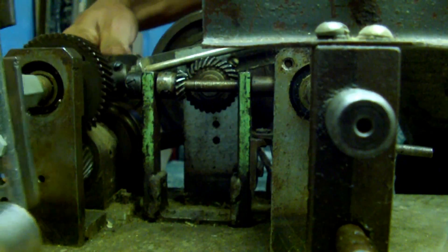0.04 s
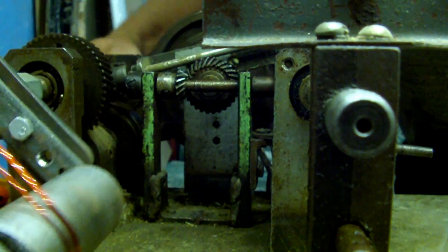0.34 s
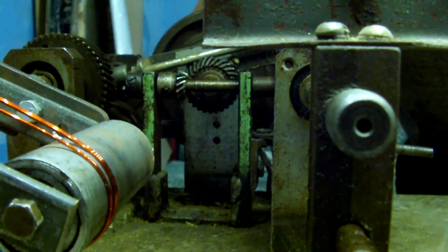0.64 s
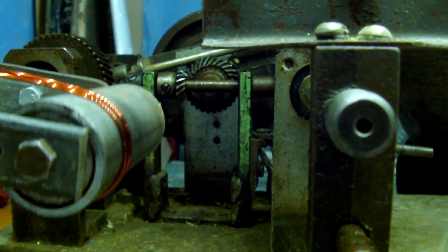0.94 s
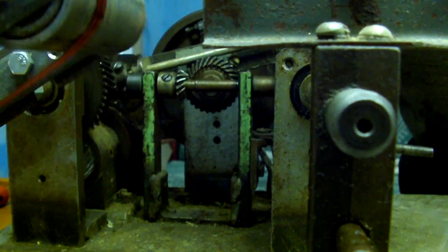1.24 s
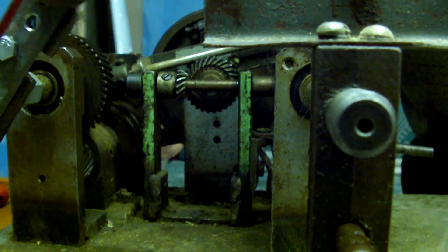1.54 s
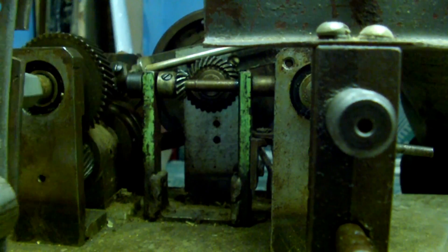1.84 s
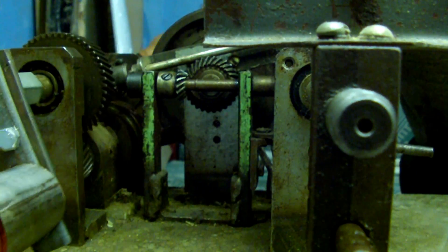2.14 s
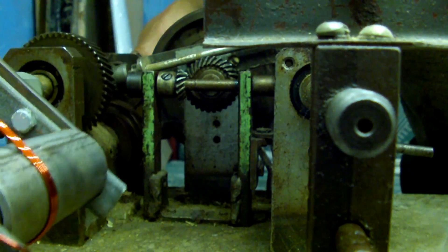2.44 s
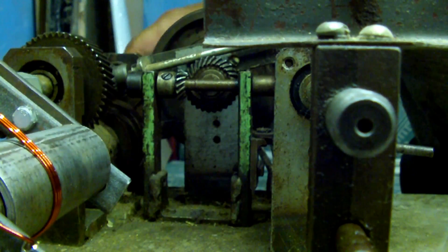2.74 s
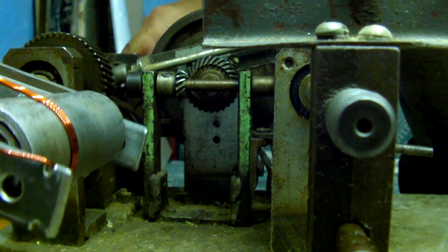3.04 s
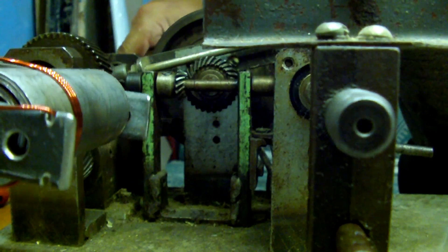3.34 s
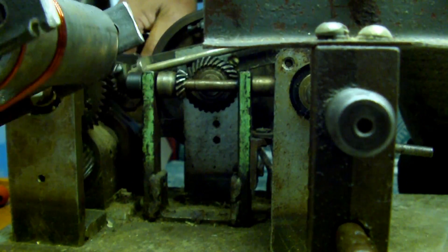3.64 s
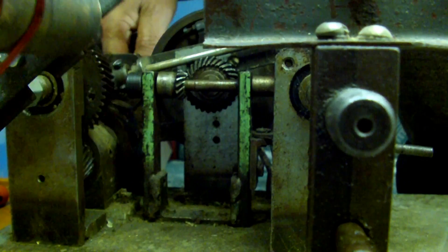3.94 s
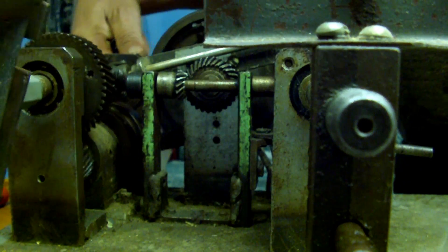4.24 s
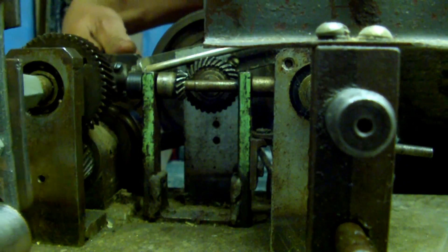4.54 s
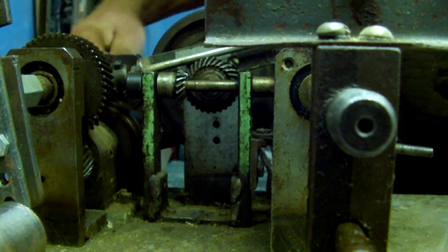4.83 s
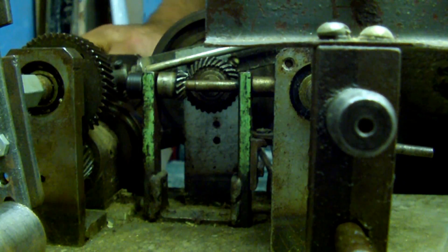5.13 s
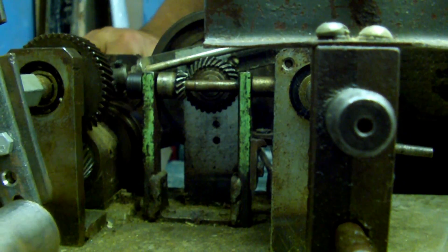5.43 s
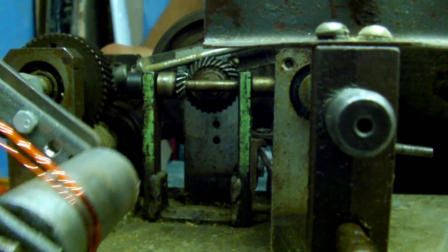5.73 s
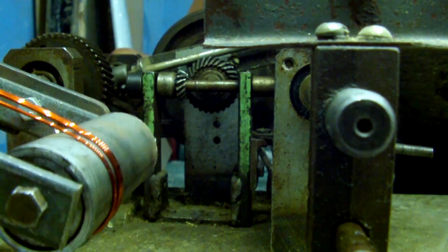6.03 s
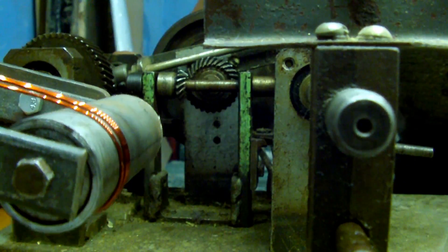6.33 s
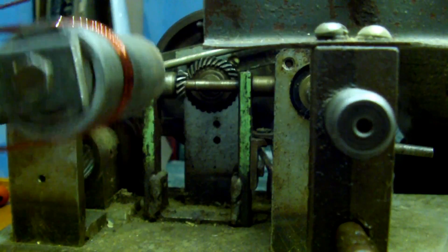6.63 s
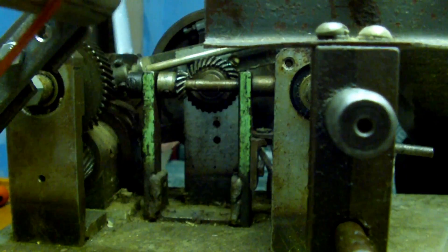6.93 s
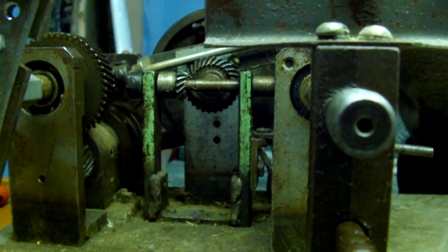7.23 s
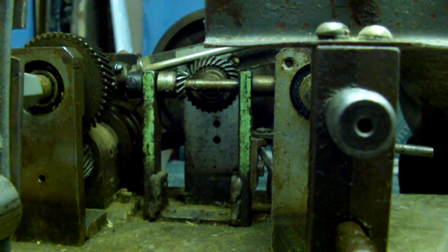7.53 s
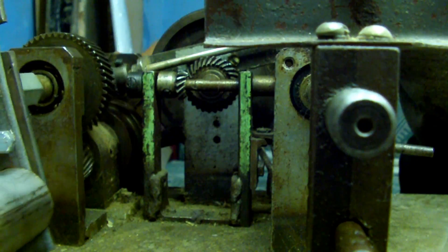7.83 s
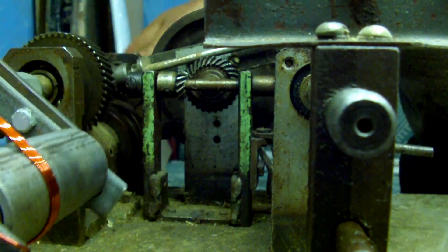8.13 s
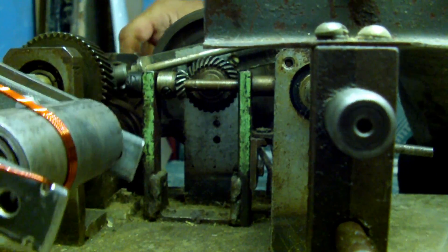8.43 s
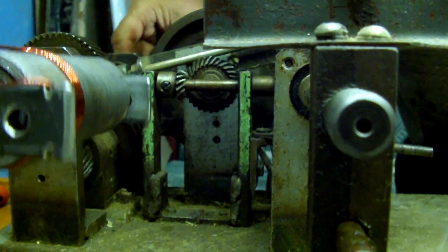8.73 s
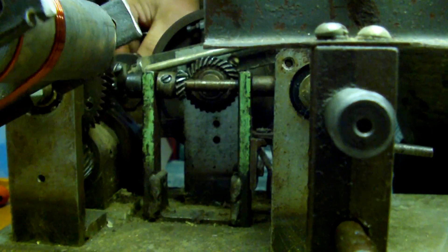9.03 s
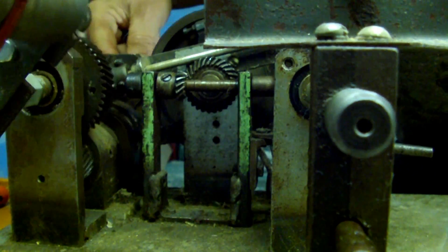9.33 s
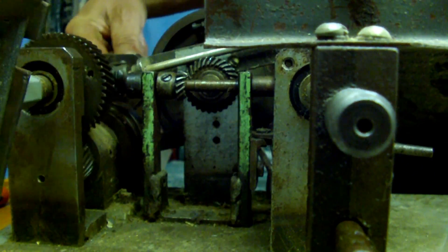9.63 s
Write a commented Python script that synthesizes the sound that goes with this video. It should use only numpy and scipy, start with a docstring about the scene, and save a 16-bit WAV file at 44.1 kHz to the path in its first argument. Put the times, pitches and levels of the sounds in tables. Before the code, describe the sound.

Metal gears whirr and rattle in surges as a coil winder is turned by hand, with irregular clicks and a few sharp clanks.

```python
"""A small workshop, the microphone close to a hand-turned coil winder, over room hiss and a thin whine.
The gears whirr at once; slack teeth knock on the steel frame, hardest at 0.5 s, and copper wire snaps
on the former. From 1 s on, the train clunks and clatters whenever the load on the arm turns over,
between pulls on the wheel and faint ticks and chirps. Around 5 s the crank creaks twice, each time
before a knock. A second hard blow lands at 8.2 s, and a last pull sets the wheels singing near 9.6 s."""
import sys
import numpy as np
from scipy import signal
from scipy.fft import rfft, irfft
from scipy.io import wavfile
from scipy.ndimage import uniform_filter1d

SR = 44100
rng = np.random.default_rng(int(sys.argv[2]) if len(sys.argv) > 2 else 0)


def master_out(mix):
    """Clip the mix to full scale and print it as 16-bit PCM to the path in sys.argv[1]."""
    frames = np.transpose(np.atleast_2d(mix))
    ceiling = np.clip(frames, -1, 1)
    pcm = np.round(ceiling * 32767).astype(np.int16)
    wavfile.write(sys.argv[1], SR, pcm)


N = 430857
T = np.arange(N) / SR
RING_S = np.arange(SR // 8) / SR  # time axis of one short event


def undb(db):
    """Decibels to gain."""
    return 10 ** (np.asarray(db) / 20)


def unit(x):
    """Scale to rms 1."""
    return x / np.sqrt(np.mean(x ** 2))


def peak(x, db):
    """Scale so that the loudest two milliseconds have this level."""
    return x * undb(db) / np.sqrt(uniform_filter1d(x ** 2, size=88).max())


def colour(x, points):
    """Causal filter through (frequency_hz, gain_db) points, built from the cepstrum."""
    hz, db = np.transpose(points)
    size = 4096
    bins_hz = np.maximum(np.fft.rfftfreq(size, 1 / SR), 1)
    gain = undb(np.interp(np.log(bins_hz), np.log(hz), db))
    cepstrum = irfft(np.log(gain))
    cepstrum[1:size // 2] *= 2
    cepstrum[size // 2 + 1:] = 0
    return signal.fftconvolve(x, irfft(np.exp(rfft(cepstrum))))[:len(x)]


def resonate(x, hz, width_hz):
    """One resonance with gain 1 at its centre."""
    return signal.lfilter(*signal.iirpeak(hz, hz / width_hz, fs=SR), x)


def band(x, hz, width_hz):
    """The same resonance twice, for steeper sides."""
    return resonate(resonate(x, hz, width_hz), hz, width_hz)


def wander(rate_hz):
    """Smoothed random levels with rms 1."""
    hold = max(int(SR / rate_hz), 1)
    steps = np.repeat(rng.standard_normal(N // hold + 1), hold)
    return unit(uniform_filter1d(uniform_filter1d(steps, hold), hold)[:N])


def swell(middle_s, half_s):
    """A smooth rise and fall in time, 1 at its middle."""
    return np.exp(-((T - middle_s) / half_s) ** 2 / 2)


def rise(time_s):
    """Exponential onset of a short event."""
    return 1 - np.exp(-RING_S / time_s)


def fade(t60_s):
    """Exponential decay of a short event."""
    return np.exp(-np.log(1000) * RING_S / t60_s)


def burst(t60_s):
    """A dying burst of noise."""
    return rng.standard_normal(len(RING_S)) * fade(t60_s)


def add(out, start_s, x):
    """Mix x into out at start_s."""
    i = max(int(start_s * SR), 0)
    out[i:i + len(x)] += x[:max(N - i, 0)]


# Room tone of the workshop: frequency_hz, gain_db
AIR_SPECTRUM = [(25, -0.5), (110, -22), (300, -16), (1100, -6.5), (2800, -18.5), (6000, -16), (12000, -15),
                (15500, -12.5)]
# Lines of a thin, high electrical whine: pitch_hz, level_db, spread_db
WHINE_LINES = [(8300, -74.5, 1), (9126, -65, 3), (11865, -75, .5), (15703, -74.5, .5)]

def background(air_db=-60, hiss_db=-68, rumble_db=-69.5):
    """Room hiss and a thin, high electrical whine; each channel has its own faint hiss and rumble."""
    air = undb(air_db) * unit(colour(rng.standard_normal(N), AIR_SPECTRUM))
    whine = 0
    for hz, db, spread_db in WHINE_LINES:
        pitch_hz = hz + 2 * spread_db * wander(40)
        tone = np.sqrt(2) * np.sin(2 * np.pi * np.cumsum(pitch_hz) / SR)
        gain = unit(undb(-spread_db * wander(24) ** 2))  # the treble flickers
        whine = whine + undb(db) * gain * tone
    bass_slope = [(20, -2), (100, -17.5), (4000, -53)]
    rumble = np.array([unit(colour(rng.standard_normal(N), bass_slope)) for _ in range(2)])
    return air + whine + undb(hiss_db) * rng.standard_normal((2, N)) + undb(rumble_db) * rumble


def room(x, t60_s=0.32, wet_db=-21):
    """The workshop answers with a short, dull tail, well below the direct sound."""
    t = np.arange(SR // 2) / SR
    tail = rng.standard_normal(len(t)) * np.exp(-np.log(1000) * t / t60_s) * (t > .008)
    tail = colour(tail, [(500, 9.5), (1500, -5.0), (8000, -5.5)])
    return x + undb(wet_db) * signal.fftconvolve(x, tail / np.sqrt(np.sum(tail ** 2)))[:N]


# Faint high chirps: middle_s
CHIRP_TIMES = [0.922, 3.252, 5.289, 8.37]

def chirps(pitch_hz=5400, width_hz=480, half_s=0.039, level_db=-61):
    """Faint high chirps come and go as soft swells of narrow-band noise."""
    level = undb(level_db) * sum(swell(s, half_s) for s in CHIRP_TIMES)
    return level * unit(band(rng.standard_normal(N), pitch_hz, width_hz))


# Double ticks of a small loose part: start_s
TICK_TIMES = [1.455, 3.356, 6.309, 6.892, 9.376]

def ticks(hz=2620, sag=0.099, sag_s=0.0024, t60_s=0.023, gap_s=0.021, bounce_db=-2, level_db=-44):
    """A loose part drops and bounces once; each touch is a dry tap with a brief falling ping."""
    out = np.zeros(N)
    for start_s in TICK_TIMES:
        for delay_s, loss_db in ((0, 0), (gap_s, bounce_db)):
            pitch_hz = hz * (1 + sag * np.exp(-RING_S / sag_s) + 0.02 * rng.standard_normal())
            ping = np.sin(2 * np.pi * np.cumsum(pitch_hz) / SR) * fade(t60_s) * rise(sag_s)
            tap = resonate(burst(t60_s), hz, hz / 10)
            add(out, start_s + delay_s, peak(unit(ping) + .5 * unit(tap), level_db + loss_db))
    return out


# Creaks at the crank: start_s, pitch_hz, level_db
CRANK_CREAKS = [(4.73, 1150, -41.5), (5.327, 770, -46.5)]

def creaks(step_s=0.0095, width_hz=380, slips=7):
    """The crank sticks and slips in a short, low creak."""
    out = np.zeros(N)
    for start_s, pitch_hz, db in CRANK_CREAKS:
        for k in range(slips):
            slip = band(burst(.016), pitch_hz, width_hz)
            add(out, start_s + k * step_s, peak(slip, db + 2 * rng.standard_normal()))
    return out


# Fast pulls on the hand wheel: middle_s, half_length_s
WHEEL_PULLS = [(0, 0.098), (1.879, 0.28), (4.356, .2), (7.298, 0.23), (9.631, .14)]

def wheel_speed():
    """Speed of the hand wheel: 0 at a crawl, 1 in a fast pull."""
    return sum(np.exp(-((T - s) / half_s) ** 4) for s, half_s in WHEEL_PULLS)


# How hard the hand drives the gears, as the level of their rattle: time_s, level_db
HAND_DRIVE = [(0.0, -45.5), (0.41, -46), (0.76, -62), (1.82, -44), (2.47, -49), (2.75, -60.5), (3.94, -56),
              (4.33, -45), (5.12, -63.5), (5.39, -65.5), (5.71, -43), (6.09, -63.5), (6.77, -57.5),
              (7.32, -44), (7.51, -57), (8.16, -46), (8.54, -51), (9.09, -62), (9.55, -45.5), (9.77, -48.5)]
# Clatter as the load on the arm turns over: middle_s, half_length_s, relative_db
LOAD_CLATTERS = [(1.274, 0.061, -35), (3.577, 0.097, -44.5), (6.757, 0.09, -43), (8.939, 0.079, -41)]
# Dry scrapes of the sliding parts: middle_s, half_length_s, level_db
DRY_SCRAPES = [(1.208, 0.0062, -41.5), (1.3, 0.0059, -65), (2.56, 0.1, -53), (3.115, 0.066, -54),
               (3.889, 0.014, -46.5), (8.518, 0.01, -45)]

def gear_levels(pull_db=-47.5, firm_drive_db=-47.5, firm_hiss_db=-54, hiss_slope=0.74,
                jam_db=-10, stall_db=-13, clatter_rattle_db=-4, clatter_hiss_db=-10):
    """Rattle and hiss gains: both follow the hand, hold up in a pull, sink in a jam, swell in a clatter."""
    hand_db = np.interp(T, *np.transpose(HAND_DRIVE))
    # a blow above jam_db stalls the wheel a moment later
    stall = sum(swell(s + 0.17, half_s=0.027) for s, db, _ in TOOTH_KNOCKS if db > jam_db)
    drive = np.maximum(undb(hand_db + stall_db * stall), undb(pull_db) * wheel_speed())
    sliding = undb(firm_hiss_db) * (drive / undb(firm_drive_db)) ** hiss_slope
    clatter = sum(undb(db) * swell(s, half_s) for s, half_s, db in LOAD_CLATTERS)
    scrapes = sum(undb(db) * swell(s, half_s) for s, half_s, db in DRY_SCRAPES)
    rattle = np.hypot(drive, undb(clatter_rattle_db) * clatter)
    hiss = np.hypot(sliding, undb(clatter_hiss_db) * clatter + scrapes)
    return rattle, hiss


# Resonances of the meshing wheels: pitch_hz, width_hz, gain_db
WHEEL_MODES = [(1070, 60, -3), (1640, 90, 2), (2140, 90, 4), (2280, 60, -3), (3270, 120, -8),
               (4780, 130, -7), (5500, 110, -4), (10000, 150, -15)]
# Gear rattle from close by: frequency_hz, gain_db
RATTLE_SPECTRUM = [(120, -17.5), (350, -30.5), (550, -11), (1100, 5.5), (1800, 4), (2800, -2), (5000, -60)]
# Hiss of the sliding parts: frequency_hz, gain_db
SLIDE_SPECTRUM = [(1200, -9.5), (3000, 2.5), (4200, 1), (6200, -1), (9500, -4.5), (15500, -29.5)]

def gears(slow_hz=52, fast_hz=110, sing_db=2.5, tooth_spread_db=1, uneven_db=2.5, grit_db=1.5, rasp_db=-2):
    """Teeth engage one by one, each with a tap and a short scrape; on a fast pull the wheels sing."""
    speed = wheel_speed()
    tooth_hz = (slow_hz + (fast_hz - slow_hz) * speed) * (1 + 0.035 * wander(60))
    teeth_passed = np.cumsum(tooth_hz) / SR
    tooth = teeth_passed.astype(int)
    # slow teeth land more unevenly than fast ones
    force = undb(tooth_spread_db * (2 - speed / 2) * rng.standard_normal(tooth[-1] + 1)[tooth])
    taps = unit(force * np.diff(tooth, prepend=0))
    scrape = force * np.exp(-(teeth_passed % 1) / .5)
    mesh = .5 * taps + unit((.5 + scrape) * rng.standard_normal(N))
    wheels = unit(sum(undb(db) * resonate(mesh, hz, width) for hz, width, db in WHEEL_MODES))
    # the bearings rub unevenly at a crawl and smoothly at speed
    unevenness = undb(uneven_db * (1 - speed / 2) ** 2 * wander(70))
    grip = unit((1 + (1 - speed) * (scrape - .5)) * unevenness)
    grit = unit(undb(grit_db * wander(350)))
    friction = grip * grit * rng.standard_normal(N)
    frame = sum(undb(db / 2) * resonate(friction, hz, 2.2 / t60_s)
                for hz, db, t60_s in FRAME_MODES if hz < 2000)
    rattle = unit(unit(colour(friction, RATTLE_SPECTRUM)) + unit(frame))
    slide = colour(np.sqrt(grip) * rng.standard_normal(N), SLIDE_SPECTRUM)
    rasp = undb(rasp_db) * (1 - speed) * resonate(slide, hz=3000, width_hz=300)
    singing = undb(sing_db) * speed
    body = (rattle + singing * wheels) / np.sqrt(1 + singing ** 2)
    rattle_gain, hiss_gain = gear_levels()
    return rattle_gain * body + hiss_gain * unit(slide + rasp)


# Clunks in the gear train: start_s, level_db
WHEEL_CLUNKS = [(0.957, -42), (1.02, -40), (1.196, -29.5), (1.247, -29), (1.372, -38.5), (2.177, -47),
                (3.0, -49), (3.098, -41.5), (3.447, -43.5), (3.578, -35), (3.673, -37), (6.638, -38.5),
                (6.727, -34.5), (6.795, -38.5), (8.472, -39.5), (8.725, -40), (8.877, -30.5),
                (8.954, -36.5)]
# Hollow modes of the machine bed: pitch_hz, gain_db
BED_MODES = [(530, -3.5), (640, -6.5), (790, 3), (1030, 2.5)]

def clunks(t60_s=0.045, rise_s=0.0018, scatter_db=1.5, grit_db=-6, grit_t60_s=0.19):
    """A heavy wheel drops in its play: the machine bed answers hollowly while the teeth grate."""
    out = np.zeros(N)
    hz, mode_db = np.transpose(BED_MODES)
    for start_s, db in WHEEL_CLUNKS:
        scatter, detune, phase = rng.standard_normal((len(hz), 3)).T
        swing = np.sin(2 * np.pi * np.outer(hz * (1 + 0.027 * detune), RING_S) + phase[:, None])
        ring = undb(mode_db + scatter_db * scatter) @ swing * fade(t60_s)
        grit = undb(grit_db) * unit(colour(burst(grit_t60_s), RATTLE_SPECTRUM))
        add(out, start_s, peak((unit(ring) + grit) * rise(rise_s), db))
    return out


# Copper wire snapping into place on the former: start_s, relative_db
WIRE_SNAPS = [(0.262, -25.5), (0.2748, -26.5), (0.5395, -28), (0.68, -39), (0.7136, -27), (1.262, -32.5),
              (3.6522, -36), (4.397, -38), (4.522, -39), (4.8799, -34), (6.758, -35), (8.0778, -34),
              (8.9525, -36)]
# Bright skid of the wire: frequency_hz, gain_db
SKID_SPECTRUM = [(400, -16.5), (1200, 15.5), (2400, -2), (4000, 0), (6800, 4.5), (9000, -0.5),
                 (15500, -13.5)]

def snaps(skid_t60_s=0.04, arm_t60_s=0.25, arm_db=-9, gain_db=2):
    """The taut wire skids over its neighbours for a few milliseconds; the arm rings on."""
    out = np.zeros(N)
    for start_s, db in WIRE_SNAPS:
        skid = colour(burst(skid_t60_s) * rise(.0015), SKID_SPECTRUM)
        arm = band(burst(arm_t60_s), hz=1200, width_hz=400)
        add(out, start_s, peak(unit(skid) + undb(arm_db) * unit(arm), db + gain_db))
    return out


def contact_softness(db):
    """0.15 for a hard, brief contact, up to 1 for a soft, lingering one."""
    return np.clip((-18 - db) / 10, .15, 1)


# Modes of the steel frame: pitch_hz, gain_db, t60_s
FRAME_MODES = [(630.5, -15, 0.055), (836, -7, 0.069), (1054.3, 2, 0.06), (1267, -9.5, 0.061),
               (1405, 6.5, 0.043), (1477, -6, 0.043), (1601.4, 0, 0.048), (1850, -3.5, 0.019),
               (1980, -10.5, 0.085), (3684, -5.5, 0.028)]
# Crack of a tooth landing: frequency_hz, gain_db
CRACK_SPECTRUM = [(80, -38.5), (160, -10.5), (350, -37), (1450, -9), (2000, -5.5), (2800, -25.5),
                  (3900, -13.5), (6000, -26.5), (15000, -46)]

def frame_blow(db, lead_hz, lead_db=2, scatter_db=4, droop=0.15, release_s=.004, crack_db=-16):
    """Where a blow lands decides which mode leads; soft contacts droop in pitch, hard ones crack."""
    hz, mode_db, t60_s = np.transpose(FRAME_MODES)
    scatter, detune, grip = rng.standard_normal((3, len(hz)))
    softness, excess_db = contact_softness(db), max(db + 15.5, 0)
    near_lead = np.exp(-(np.log(hz / lead_hz) / 0.11) ** 2)
    lift_db = (mode_db.max() + lead_db - np.interp(lead_hz, hz, mode_db)) * near_lead
    # bending waves travel slower at low pitch, so the low modes build up later
    build_s = np.clip(.0012 * softness * (lead_hz / hz) ** 4, .0004, .005)
    decay_s = t60_s * undb(2 * softness * grip)
    envelopes = fade(decay_s[:, None]) * rise(build_s[:, None])
    # a lingering contact stiffens the lower modes; their pitch droops as the tooth lets go
    stiffen = droop * softness * (hz < 2500)
    clock_s = RING_S + np.outer(stiffen, release_s * rise(release_s))
    swing = np.sin(2 * np.pi * (hz * (1 + 0.0088 * detune))[:, None] * clock_s)
    ring = undb(mode_db + lift_db + scatter_db * np.sqrt(softness) * scatter) @ (envelopes * swing)
    crack = undb(crack_db + .5 * excess_db) * unit(colour(burst(0.07), CRACK_SPECTRUM))
    # the hardest blows are too brief to move the bass, the softest too slow to reach the treble
    bass_db, treble_db = -1.4 * excess_db, min(db + 22.5, 0)
    tilt = [(200, bass_db), (500, 0), (2200, 0), (3500, treble_db)]
    return peak(colour(unit(ring) + crack, tilt), db)


# Blows as the gears take up their slack, close to the microphone: start_s, level_db, lead_pitch_hz
TOOTH_KNOCKS = [(0.04, -31, 1360), (0.144, -40.5, 1080), (0.197, -35.5, 1070), (0.24, -32.5, 1340),
                (0.27, -24, 1080), (0.295, -28.5, 1390), (0.339, -31.5, 1360), (0.42, -28, 1410),
                (0.4865, -3.5, 1518), (0.956, -42, 1560), (1.197, -32.5, 1410), (1.219, -31, 1410),
                (1.263, -31, 1510), (1.29, -27.5, 1890), (1.362, -39, 1140), (1.458, -42, 1240),
                (2.321, -23.5, 1503), (2.409, -38, 1380), (2.495, -36, 1417), (2.83, -47.5, 1390),
                (3.587, -38.5, 1630), (3.707, -41.5, 1580), (4.004, -42.5, 1580), (4.091, -36, 1380),
                (4.179, -31.5, 1377), (4.248, -30, 1470), (4.32, -32.5, 1320), (4.403, -33, 1220),
                (4.497, -36, 1380), (4.527, -39.5, 1022), (4.705, -30, 1340), (4.842, -24, 1770),
                (5.402, -15, 1439), (5.607, -35, 1488), (5.669, -28.5, 1330), (5.739, -16, 1480),
                (5.768, -33.5, 1670), (5.789, -31, 1563), (6.731, -35.5, 1940), (8.088, -35, 1035),
                (8.19, -17.5, 1380), (8.234, -3.5, 1524), (8.445, -41, 1700), (8.56, -35.5, 1400),
                (8.627, -38.5, 1370), (8.724, -37, 1594), (8.831, -42, 1400), (8.883, -35, 1940),
                (9.008, -41, 1470), (9.394, -33.5, 1460), (9.492, -32.5, 1407), (9.559, -31, 1380),
                (9.65, -32.5, 1410)]

def knocks(touches=3, hard_gap_s=.012, soft_gap_s=.008, bounce_db=-7, soft_lift_db=2, sag=.94):
    """Slack teeth chatter, each touch weaker and lower; soft knocks rebound sooner and more fully."""
    out = np.zeros(N)
    for start_s, db, lead_hz in TOOTH_KNOCKS:
        softness = contact_softness(db)
        gap_s = hard_gap_s + (soft_gap_s - hard_gap_s) * softness
        for k in range(touches):
            delay_s = k * gap_s * (1 + 0.11 * rng.standard_normal())
            loss_db = (bounce_db + soft_lift_db * softness) * k * (k + 1) / 2
            add(out, start_s + delay_s, frame_blow(db + loss_db, lead_hz * sag ** (k * softness)))
    return out


def scene():
    """The winder stands close and straight ahead, the same in both channels."""
    winder = knocks() + clunks() + snaps() + gears() + ticks() + creaks()
    return room(winder + chirps()) + background()


def record(dry, notch_hz=7870, notch_width_hz=260, top_hz=15900):
    """The microphone port cuts a notch; the right side is a shade louder, peaks clip, the top is cut."""
    notched = dry - 0.73 * resonate(dry, notch_hz, notch_width_hz)
    clipped = np.clip(notched * undb([[-.06], [.06]]), -1, 1)
    return signal.sosfilt(signal.ellip(10, .2, 80, top_hz, fs=SR, output="sos"), clipped)


dry = scene()
out = record(dry)
master_out(out)
```